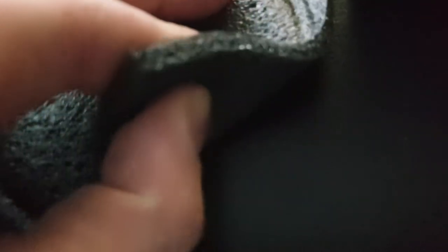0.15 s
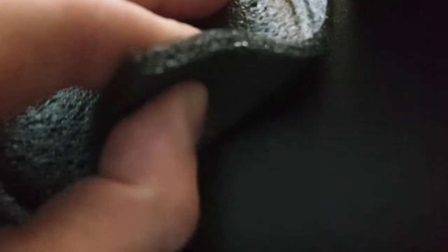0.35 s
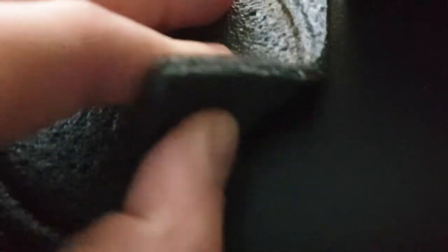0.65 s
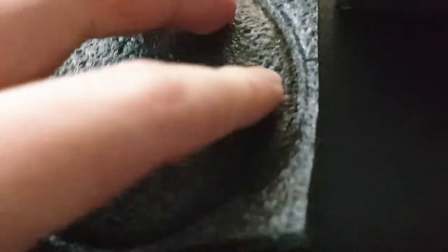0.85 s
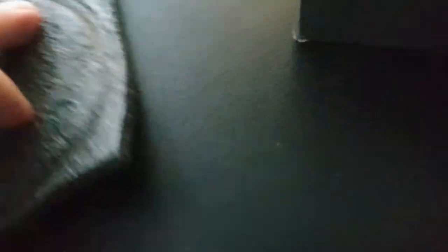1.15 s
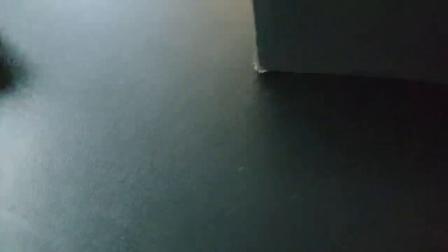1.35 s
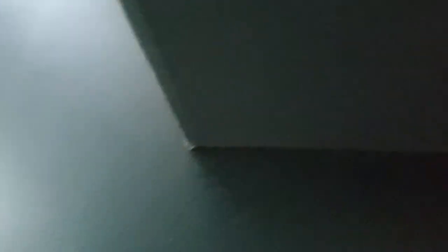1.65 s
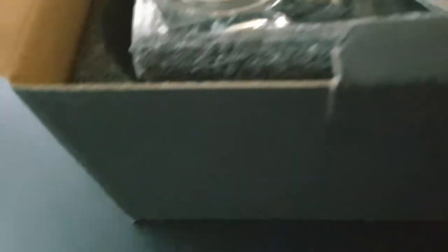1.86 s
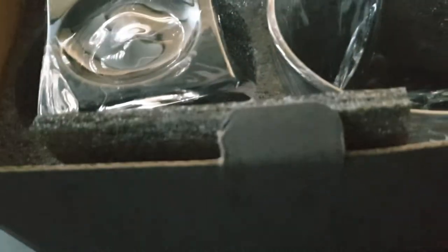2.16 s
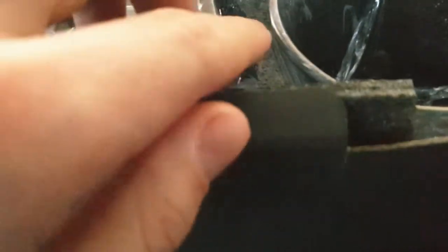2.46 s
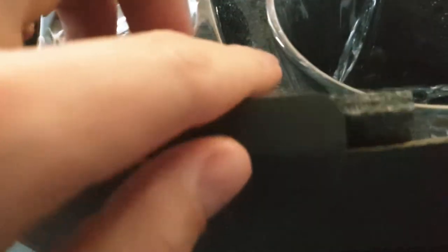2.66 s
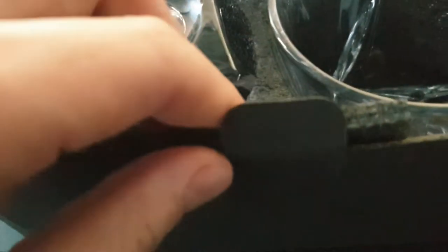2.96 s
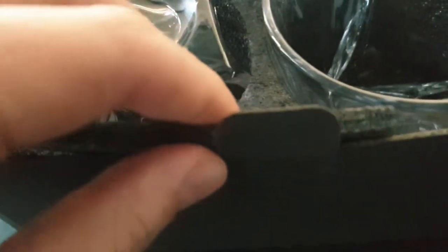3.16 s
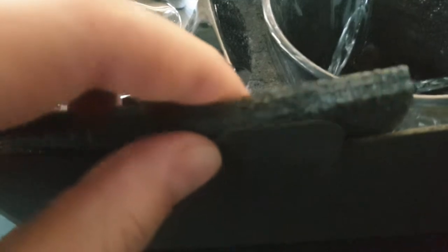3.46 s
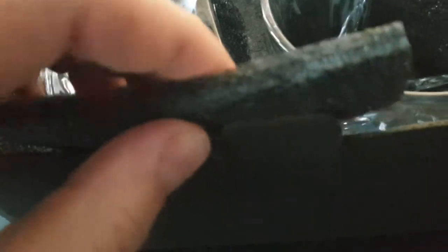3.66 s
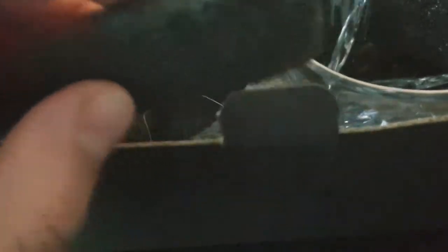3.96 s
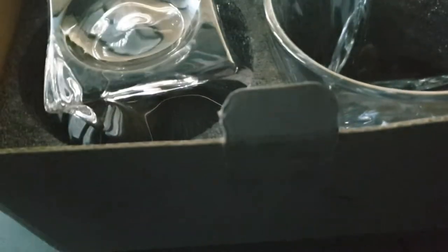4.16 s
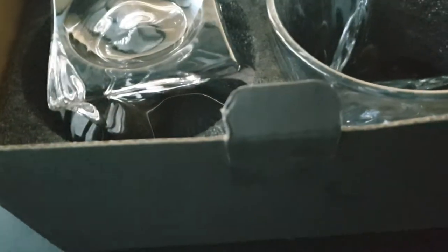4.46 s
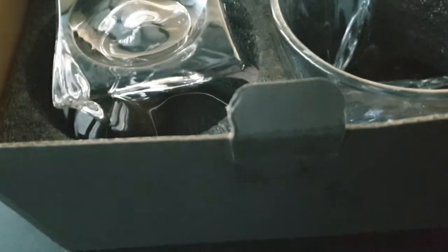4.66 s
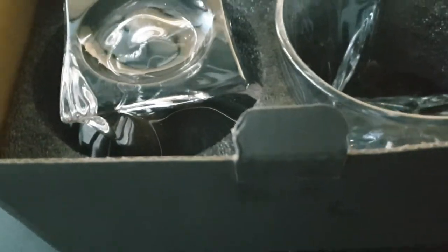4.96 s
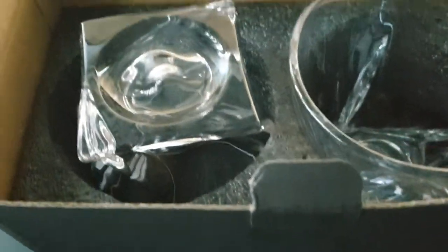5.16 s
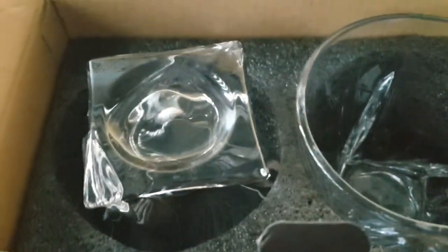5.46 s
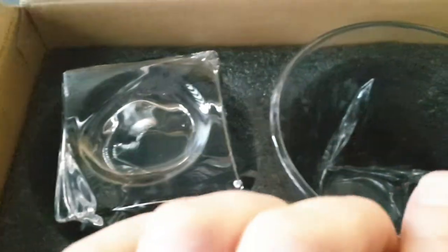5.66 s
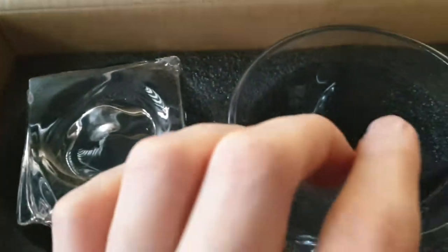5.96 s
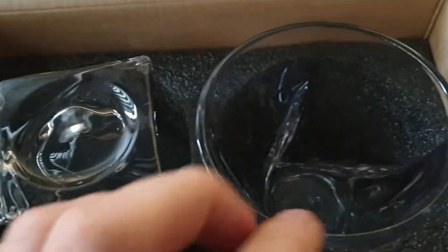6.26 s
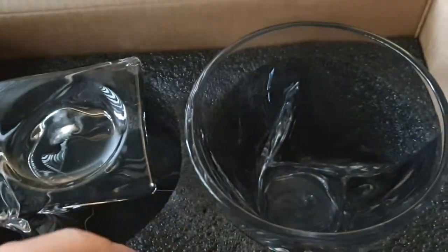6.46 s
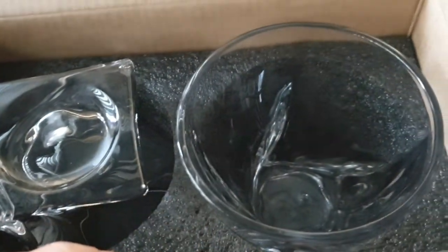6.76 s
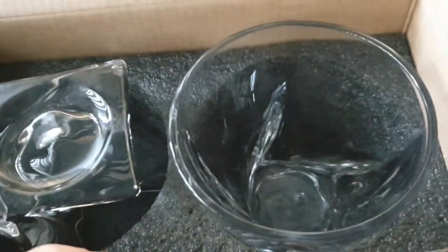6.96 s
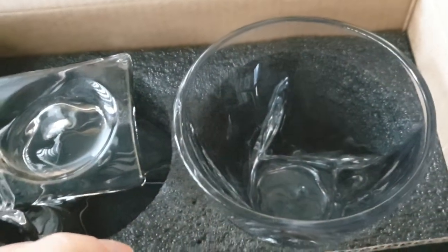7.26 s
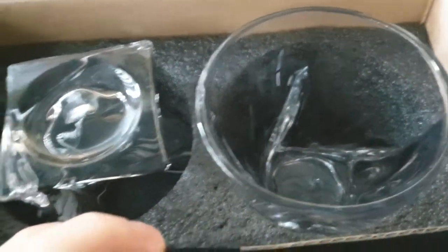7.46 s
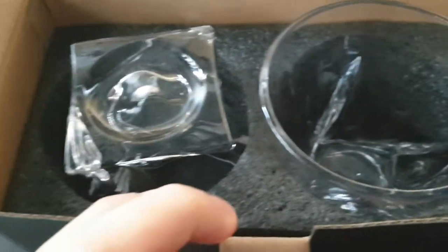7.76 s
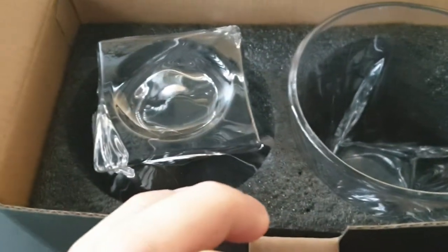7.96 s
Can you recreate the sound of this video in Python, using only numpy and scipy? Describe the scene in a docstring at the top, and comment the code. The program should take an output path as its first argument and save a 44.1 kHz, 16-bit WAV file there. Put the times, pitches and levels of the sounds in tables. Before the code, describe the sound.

Foam packing is pulled from a cardboard box holding glassware on a desk. Light rubbing and ticks lead into one long bright scraping hiss, then a pause, loud card snaps, short gritty scrapes and soft crackles. Later come dull box bumps, a barely audible glassy brush and a sharp final snap. Close stereo microphone, dry, with short reflections and quiet room hiss.

```python
"""Foam packing is pulled from a cardboard box of glassware on a desk, close microphone, small quiet room.
Room tone lies under all of it. Fingers rub and tick a foam block loose; it slides out in one hissing pull.
Then the hand knocks the flap, and a strip of foam catches and comes up in jerks: cells hiss, edges rasp.
Last the flap folds over, a brushed glass sings faintly and the flap clicks hard twice.
Filtered noise makes the rubbing, damped modes the snaps and box bumps; sparse reflections answer."""
import sys
import numpy as np
from scipy import signal
from scipy.fft import rfft, irfft, next_fast_len
from scipy.io import wavfile
from scipy.ndimage import map_coordinates

SR = 44100
rng = np.random.default_rng(int(sys.argv[2]) if len(sys.argv) > 2 else 0)


def generate_wav(signal):
    """Clip the signal to [-1, 1] and save it as 16-bit WAV at the path in sys.argv[1]."""
    frames = np.transpose(np.atleast_2d(signal))
    scaled = np.clip(frames, -1, 1) * 32767
    pcm = np.round(scaled).astype(np.int16)
    wavfile.write(sys.argv[1], SR, pcm)


N = 358091


def amp(db):
    """Decibels to gain."""
    return 10 ** (np.asarray(db) / 20)


def unit(x):
    """Scales to an rms of one."""
    return x / np.sqrt(np.mean(x ** 2) + 1e-20)


def read(points, hz):
    """Reads a table along a logarithmic frequency axis."""
    f, value = np.transpose(points)
    return np.interp(np.log(hz + 1), np.log(f + 1), value)


def add(mix, start_s, sound):
    """Mixes a stereo sound in at its start time."""
    part = mix[:, max(round(start_s * SR), 0):][:, :sound.shape[1]]
    part += sound[:, :part.shape[1]]


def placed(x, side_db):
    """Leans a sound to the left by side_db."""
    return x * amp(np.array([side_db, -side_db]).reshape(2, -1) / 2)


def wobble(size, span_s):
    """Smooth random curve of unit rms that changes over span_s."""
    width = max(int(span_s * SR), 2)
    return unit(signal.oaconvolve(rng.standard_normal(size + width + 1), np.hanning(width + 2), "valid"))


def colour(x, spectrum, size=4096):
    """Causal minimum-phase filter with the given spectrum."""
    log_gain = np.log(amp(read(spectrum, abs(np.fft.fftfreq(size, 1 / SR)))))
    taps = np.fft.ifft(np.exp(np.conj(signal.hilbert(log_gain)))).real
    return signal.oaconvolve(x, taps[None], axes=1)[:, :x.shape[1]]


# Left-right likeness of noise at the microphone: pitch_hz, likeness (1 = identical)
LIKENESS = [(100, .88), (400, .95), (1000, .84), (2500, .7), (5000, .55), (9000, .2), (16000, .15)]


def noise(size):
    """Noise at two microphone ports: alike in the bass, nearly unrelated in the treble."""
    padded = next_fast_len(size)
    a, b = rfft(rng.standard_normal((2, padded)))
    same = np.clip(read(LIKENESS, np.linspace(0, SR / 2, len(a))), -1, 1)
    return irfft([a, same * a + np.sqrt(1 - same ** 2) * b], padded)[:, :size]


def narrow_noise(size, hz, width_hz):
    """Noise in one resonance."""
    edges = [hz - width_hz / 2, hz + width_hz / 2]
    band = signal.butter(2, edges, "bandpass", fs=SR, output="sos")
    return unit(signal.sosfilt(band, noise(size)))


FALL_DB, FALL_SHAPE = 15.5, 1.3  # a movement loses FALL_DB in its fall time, slowly at first


def swell(t, rise_s, fall_s):
    """A movement gathers speed smoothly and dies away."""
    gather = np.sin(np.pi / 2 * np.clip(t / rise_s, 0, 1)) ** 2
    return gather * amp(-FALL_DB * (np.maximum(t - rise_s, 0) / fall_s) ** FALL_SHAPE)


# Spectrum of the quiet room: pitch_hz, level_db per Hz (relative)
ROOM_SPECTRUM = [(20, -12.5), (40, -6.5), (55, 10), (80, 0.5), (125, -3.5), (200, -9.5), (300, -13),
                 (600, -25), (1000, -29.5), (1900, -25), (3500, -30.5), (4500, -32.5), (6000, -34),
                 (15500, -35.5)]
# The box rumbles as it shifts on the desk: start_s, rise_s, fall_s, level_db
BOX_SHIFTS = [(.95, 0.17, 1, -56), (2.43, .15, 0.52, -52.5), (3.1, 0.2, .6, -62), (4.45, 0.18, 0.74, -61),
              (5.35, .3, .55, -53.5)]


def room_tone(rumble_db=-69, hiss_db=-65.0, waver_db=2.5, side_db=4.0):
    """Wavering rumble of the building under a faint hiss; the rumble swells when the box shifts."""
    t = np.arange(N) / SR
    level = amp(rumble_db + waver_db * wobble(N, .3))
    for start_s, rise_s, fall_s, db in BOX_SHIFTS:
        level = np.hypot(level, amp(db) * swell(t - start_s, rise_s, fall_s))
    bed = unit(colour(noise(N), ROOM_SPECTRUM))
    bass = signal.sosfilt(signal.butter(1, 250, fs=SR, output="sos"), bed)
    return placed(level * bass + amp(hiss_db) * (bed - bass), side_db)


# Faint steady tones in the room: pitch_hz, width_hz, level_db
ROOM_WHINE = [(1110, 25, -93.5), (4420, 91, -91.5)]


def room_whine():
    """Steady whine: noise in narrow resonances."""
    return sum(amp(db) * narrow_noise(N, hz, width_hz) for hz, width_hz, db in ROOM_WHINE)


def friction(size, spectrum, grain_db, slip_db):
    """Countless cells catch and let go: millisecond grains, bunched into uneven slips."""
    grip = amp(grain_db * wobble(size, 0.0014) + slip_db * wobble(size, 0.019))
    return unit(colour(noise(size) * grip, spectrum))


def wall_echo(x, share=0.403, path_s=.0007, drift=0.23, span_s=.25):
    """The near box wall reflects the rubbing; the path drifts at random, so the colour shifts."""
    at = np.arange(x.shape[1])
    late = path_s * SR * np.exp(drift * wobble(len(at), span_s))
    echo = np.array([map_coordinates(port, [at - late], order=3) for port in x])
    return unit(x + share * echo)


# Spectra of the foam's face and of its cut edge: pitch_hz, level_db per Hz (relative)
FOAM_CELLS = [(1000, -43), (2500, -27.5), (4000, -12.5), (5200, -3), (6600, 1.5), (8500, -2), (11500, -6),
              (15500, -5.5)]
FOAM_EDGE = [(700, -26), (1400, -13), (2000, -3.5), (2700, -5), (3800, -1.5), (5000, -4), (7000, -15.5),
             (12000, -27.5)]


def crackle(size, per_s=45, spread_db=4):
    """Now and then a single foam cell pops."""
    strength = amp(spread_db * np.minimum(rng.exponential(1, size), 3.5))
    pops = strength * (rng.random(size) < per_s / SR)
    pops = pops * (1 + rng.standard_normal((2, size)))  # the ports hear each pop differently
    return unit(unit(colour(pops, FOAM_EDGE)) + unit(colour(pops, FOAM_CELLS)))


# Spectrum of the card panels: pitch_hz, level_db per Hz (relative)
CARD_PANEL = [(30, -37), (80, -19.5), (150, -11.5), (240, -2), (320, -9), (420, -1.5), (520, -3),
              (750, -5.5), (950, -2.5), (1200, -5.5), (1600, -11), (2500, -14.5), (6000, -48)]
# Rubbing makes the card drone: pitch_hz, width_hz, level_db before drone_db, relative to the panel
DRONES = [(254, 32, -10), (860, 340, -2.5)]


def rub(size, hiss_db, rasp_db, panel_db, side_db, drone_db=0, crackle_db=-11.5, panel_side_db=5):
    """Foam on card: the face hisses, the edge rasps and crackles, and the card under it rumbles."""
    foam = amp(hiss_db) * friction(size, FOAM_CELLS, grain_db=1.0, slip_db=0.89)
    edge = wall_echo(friction(size, FOAM_EDGE, grain_db=2.0, slip_db=0.5))
    foam += amp(rasp_db) * (edge + amp(crackle_db) * crackle(size))
    card = wall_echo(friction(size, CARD_PANEL, grain_db=2.5, slip_db=1.25), path_s=0.0024)
    for hz, width_hz, db in DRONES:
        card += amp(db + drone_db) * narrow_noise(size, hz, width_hz)
    return placed(foam, side_db) + placed(amp(panel_db) * unit(card), panel_side_db)


# Short rubs and tugs of foam on card: the fingers work the block loose, reach behind the flap for
# the strip, bring it up in jerks, then press the flap down and fold it out of the way:
# start_s, rise_s, fall_s, hiss_db, rasp_db, panel_db, side_db (left over right)
RUBS = [ (0, 0.0071, 0.42, -59.5, -74.5, -82.5, 4.5), (.5, 0.16, 0.16, -52.5, -66.5, -88, 5),
        (.66, .125, 0.11, -44.5, -52, -80, 3), (2.41, 0.032, 0.097, -57, -54, -47, 6),
        (2.541, 0.031, .06, -66, -61, -53, 3.5), (2.596, 0.052, 0.13, -63, -53.5, -47.5, 5),
        (2.74, 0.053, 0.048, -51.5, -54.5, -45, 5), (2.801, 0.063, 0.25, -60.5, -82, -74, 5),
        (2.968, .018, 0.073, -47, -57, -50, 4.5), (3.048, 0.075, 0.27, -55.5, -67, -65.5, 6.5),
        (3.219, 0.17, 0.12, -51.5, -63.5, -54, 7.5), (3.389, 0.085, .12, -46.5, -52.5, -50.5, 5.5),
        (3.59, 0.074, 0.1, -44.5, -50, -53, 9.5), (3.68, 0.087, 0.12, -41, -42, -48, 5),
        (3.84, .1, 0.21, -62.5, -58, -49.5, 21), (3.945, 0.032, 0.025, -46.5, -45, -53, 4.5),
        (3.989, 0.046, 0.025, -50, -52, -48, 4), (4.02, .06, 0.37, -58.5, -88, -83, 10.5),
        (4.163, 0.016, 0.03, -43, -50, -49.5, 11), (4.195, 0.038, 0.055, -51, -55.5, -65, 9),
        (4.241, .022, 0.089, -40, -44, -63, 8.5), (4.378, 0.048, .09, -46, -51, -87, 5.5),
        (4.425, .04, 0.04, -42, -56, -73, 7), (4.48, 0.043, 0.27, -53, -63.5, -81, 4),
        (4.64, 0.12, 0.15, -49, -59.5, -77, 5.5), (4.766, 0.028, 0.034, -41.5, -46.5, -63.5, 5.5),
        (5.54, 0.03, 0.15, -58.5, -47.5, -47.5, 1.5), (5.69, 0.099, 0.18, -87, -66, -60, 2),
        (5.812, .026, .2, -80, -57.5, -46.5, -3), (5.83, 0.097, .08, -57, -53.5, -62, 5),
        (5.97, .05, .3, -80.5, -83, -84, 7), (6.17, 0.096, 0.31, -60.5, -58, -53, 1.5),
        (6.41, .04, .1, -71.5, -66.5, -60, 3)]


def stroke(start_s, rise_s, fall_s, hiss_db, rasp_db, panel_db, side_db):
    """One short rub: all its layers follow the same swell."""
    t = np.arange(0, rise_s + 2 * fall_s, 1 / SR)
    return start_s, swell(t, rise_s, fall_s) * rub(len(t), hiss_db, rasp_db, panel_db, side_db)


def resonance(length_s, hz, db, q, side_db=4):
    """Rubbing drives a single resonance; q is its pitch over its width."""
    size = int(length_s * SR)
    sound = amp(db) * narrow_noise(size, hz, hz / q)
    return placed(sound * signal.windows.tukey(size, .5), side_db)


# The rubbed card sings briefly: start_s, length_s, pitch_hz, level_db
CARD_GROANS = [(0, .6, 432, -72), (.112, .14, 460, -65), (1.832, 0.069, 980, -64.5),
               (1.851, 0.028, 630, -63), (2.022, 0.058, 594, -63), (2.025, .05, 1190, -70),
               (2.553, .028, 1384, -50.5), (2.6, 0.066, 1360, -50.5), (2.765, .045, 972, -47.5),
               (4.666, 0.13, 2760, -66.5), (4.812, 0.055, 650, -63), (5.832, 0.17, 2180, -60)]


def groan(start_s, length_s, hz, db):
    """The rubbed card groans in a broad resonance."""
    return start_s, resonance(length_s, hz, db, q=6)


def ring(modes, pitch=1, size=12000):
    """Response of a set of damped modes to one blow."""
    t = np.arange(size) / SR
    sound = np.zeros(size)
    for hz, t60_s, db in modes:
        decay = np.exp(-np.log(1000) * t / t60_s)
        sound += amp(db) * decay * np.sin(2 * np.pi * hz * pitch * t)
    return sound


def burst(size, contact_s):
    """A contact tears free: a short flurry of micro-slips with an even spectrum."""
    t = np.arange(size) / SR
    shape = 2 * (t / contact_s) * np.exp(1 - 2 * t / contact_s)
    even = irfft(np.exp(1j * np.angle(rfft(noise(size) * shape))), size)  # keeps only the phases
    return unit(even * np.sqrt(shape))


# Modes of the box wall, which knocks, and of its small stiff tab, which cracks:
# pitch_hz (before the snap's pitch factor), t60_s, level_db (relative)
WALL_MODES = [(251, 0.25, -20.5), (520, 0.016, -9.5), (726, 0.017, -2), (1058, 0.019, -4),
              (1415, 0.023, -5), (1820, 0.016, -1), (2700, 0.021, 1.5), (3450, 0.033, 0.5)]
TAB_MODES = [(745, 0.003, -3), (1420, .016, -7.5), (2100, 0.013, -6.5), (2840, .014, 1), (4700, .009, 5),
             (5180, .01, 0), (5620, .008, 2.5), (6340, .007, -2)]
# How well a knock, a crack and a tick radiate: pitch_hz, level_db (relative)
KNOCK_RADIATION = [(25, -34.5), (90, -11), (250, -6.5), (700, 6), (1800, 2.5), (3400, -3), (6000, -20.5)]
CRACK_RADIATION = [(100, -32.5), (450, -11.5), (700, -5), (2300, -1), (6500, -1), (8000, -7.5),
                   (12000, -22)]
TICK_RADIATION = [(4000, -32), (7500, 0), (11000, -8.5), (15000, -6.5)]
# Card and foam snap: light ticks as the block comes free, the hand knocks against the flap, the strip
# catches and lets go, the flap folds over, then clicks hard twice; levels are over 10 ms:
# start_s, knock_db, crack_db, tick_db, pitch_factor, side_db (left over right)
CARD_SNAPS = [ (.163, -90, -70, -50, 0.93, 6), (0.669, -49, -40, -43, 1.21, 3.5),
              (.819, -70, -51.5, -41, 0.95, 8), (0.9375, -86, -44.5, -33, 1.03, 3),
              (0.986, -77, -43.5, -43, 0.8, 1), (1.8993, -66.5, -74, -71, .86, -13),
              (1.936, -64, -73.5, -66, .86, -12), (2.029, -64.5, -88, -79, 0.97, -2),
              (2.431, -55.5, -54, -59.5, 1.1, 9), (2.4428, -32, -38.5, -42, .97, 3.5),
              (2.4542, -37, -41, -42, 1.56, 5), (2.467, -51, -44, -51, 1, 9),
              (2.479, -27.5, -35, -36, 1, 2.5), (2.559, -63, -64, -77, 1.1, 3),
              (2.607, -52, -61, -70.5, 1, 6), (2.703, -25, -21, -28.5, 1.057, 4),
              (2.98, -51, -50.5, -53, 1.23, 12), (2.992, -44.5, -53, -48, 0.976, 6),
              (3.4623, -46, -37.5, -40, 1.18, 7), (3.48, -39.5, -40, -38.5, 0.87, 12.5),
              (3.4865, -32, -33, -39, 0.93, 3), (3.785, -39, -50, -50, 0.76, 6.5),
              (3.872, -58, -42, -45, 1.02, 4.5), (4.1636, -66, -60, -44.5, 0.78, 12.5),
              (4.2624, -59.5, -47.5, -44.5, 1.06, 14), (5.017, -67.5, -68, -73.5, 0.51, -1.5),
              (5.532, -43.5, -55, -64, 0.936, 3), (5.542, -33, -42.5, -42, 0.93, 6),
              (5.566, -33, -34, -37.5, .95, 5), (5.574, -30.5, -36.5, -39, 1.09, 4),
              (5.593, -36, -55, -42.5, 1.1, 3), (5.688, -48, -56.5, -67, 0.88, 9),
              (5.9448, -42.5, -45.5, -56, 1.03, 3), (6.2001, -56, -61.5, -75, 1.38, 14),
              (6.3014, -28.5, -17.5, -25.5, 1.07, 6), (6.396, -40, -42, -52, 1.3, 12),
              (6.4022, -43, -36.5, -34, .35, 2), (6.405, -15.5, -23.5, -29, 1, 5.5)]
# the more the knock outweighs the tick, the longer the contact
CONTACT_S, CONTACT_DOUBLES_DB = .0015, 28.5


def snap(start_s, knock_db, crack_db, tick_db, pitch, side_db, inside_db=-10.0,
         inside_fall_s=0.019, inside_rise_s=.0017, tick_spread=1.9, size=6000):
    """A sudden release rings wall and tab; the sound scatters round the inside of the box."""
    t = np.arange(size) / SR
    contact_s = CONTACT_S * 2 ** ((knock_db - tick_db) / CONTACT_DOUBLES_DB)
    force = burst(size, contact_s)
    wall = signal.fftconvolve(force, ring(WALL_MODES, pitch, size)[None], axes=1)[:, :size]
    tab = signal.fftconvolve(force, ring(TAB_MODES, pitch, size)[None], axes=1)[:, :size]
    tick = burst(size, contact_s * tick_spread)
    inside = noise(size) * np.exp(-t / inside_fall_s) * (1 - np.exp(-t / inside_rise_s))
    layers = ((wall, KNOCK_RADIATION, knock_db), (tab, CRACK_RADIATION, crack_db),
              (tick, TICK_RADIATION, tick_db))
    sound = np.zeros((2, size))
    for x, radiation, db in layers:
        paths = colour(np.vstack([x, inside]), radiation, size=2048)
        direct, scattered = np.split(paths / np.linalg.norm(paths, axis=1, keepdims=True), 2)
        sound += amp(db) * (direct + amp(inside_db) * scattered)
    return start_s, placed(sound * np.sqrt(.01 * SR), side_db)  # unit energy to rms over 10 ms


# The foam block slides out of the box in one long pull: time_s, hiss_db (stands for its speed)
BLOCK_SPEED = [(.87, -53.5), (.93, -45), (1.0, -33.5), (1.15, -31.5), (1.26, -27), (1.41, -28), (1.5, -34),
               (1.68, -37), (1.789, -46), (1.88, -69.5), (2.0, -88)]
# Other layers follow the speed by their own law: level_db at full speed, slope_db per dB of hiss
RASP_LAW = (-44.5, .7)
PANEL_LAW = (-53.5, 0.76)
SHEEN_LAW = (-39, 2.4)
SHEEN_HZ, SHEEN_WIDTH_HZ = 6000, 1200  # bright band, strongest when the block slides fastest


def long_pull(side_db=5.0, drone_db=-7):
    """The speed of the sliding block drives hiss, rasp, card and sheen together."""
    time_s, level_db = np.transpose(BLOCK_SPEED)
    t = np.arange(time_s[0], time_s[-1], 1 / SR)
    hiss_db = np.interp(t, time_s, level_db)
    below_full_db = hiss_db - level_db.max()
    rasp_db, panel_db, sheen_db = (db + slope * below_full_db for db, slope in (RASP_LAW, PANEL_LAW, SHEEN_LAW))
    sheen = placed(amp(sheen_db) * narrow_noise(len(t), SHEEN_HZ, SHEEN_WIDTH_HZ), side_db)
    sliding = rub(len(t), hiss_db, rasp_db, panel_db, side_db, drone_db) + sheen
    return time_s[0], sliding * signal.windows.tukey(len(t), .03)


# Modes of the whole box and of its side panel: pitch_hz, t60_s, level_db (relative)
BOX_MODES = [(75.6, .16, -6), (106, 0.049, -7), (123, .15, -2.5)]
SIDE_PANEL_MODES = [(165, .08, -6), (215, .05, -6), (261, .11, -1), (335, .06, -2)]
# The box bumps on the desk: start_s, box_db, panel_db (gains on the modes)
BOX_BUMPS = [(1.13, -46.5, -54), (2.442, -38.5, -46), (2.481, -43, -40.5), (2.705, -41.5, -68),
             (4.181, -79, -52), (5.015, -48, -66), (5.536, -39.5, -34.5), (5.571, -38, -59),
             (5.69, -40.5, -45.5), (5.952, -36.5, -60), (6.008, -44.5, -45), (6.406, -38, -25.5)]


def bump(start_s, box_db, panel_db, side_db=5):
    """The box rocks on the desk and its side panel drums; the thud is high-passed so that it carries no deep
    bass."""
    thud = amp(box_db) * ring(BOX_MODES) + amp(panel_db) * ring(SIDE_PANEL_MODES)
    no_deep_bass = signal.butter(2, 65, "highpass", fs=SR, output="sos")
    return start_s, placed(signal.sosfilt(no_deep_bass, thud), side_db)


# A finger brushes the glass: start_s, length_s, pitch_hz, level_db
GLASS_BRUSHES = [(6.03, .07, 2660, -71), (6.01, .1, 4880, -78)]


def glass(start_s, length_s, hz, db):
    """The brushed glass sings faintly in a sharp resonance."""
    return start_s, resonance(length_s, hz, db, q=35)


# Phase by which the right port trails the left: pitch_hz, lag_rad
RIGHT_PORT_LAG = [(0, 0), (150, .15), (300, .25), (550, .5), (1000, 1.1), (2000, 1.4), (16000, 1.5)]


def from_left(x):
    """The hand works on the left, so its sounds reach the right port later."""
    size = next_fast_len(N)
    lag = np.exp(-1j * read(RIGHT_PORT_LAG, np.fft.rfftfreq(size, 1 / SR)))
    return np.array([x[0], irfft(rfft(x[1], size) * lag, size)[:N]])


# Decay of the room: pitch_hz, t60_s
ROOM_DECAY = [(100, .3), (300, 0.35), (700, .18), (2000, 0.21), (6000, .19), (15000, 0.12)]


def room(x, wet_db=-19, delay_s=0.01, per_s=3000, size=16384):
    """Dense reflections from the desk and near walls, each band dying at its own speed."""
    taps = noise(size) * (rng.random(size) < per_s / SR) * (np.arange(size) > delay_s * SR)
    hz, t, bands = signal.stft(taps, SR, nperseg=256)
    decay = np.exp(-np.log(1000) * t / read(ROOM_DECAY, hz)[:, None])
    tail = signal.istft(bands * decay, SR, nperseg=256)[1]
    tail /= np.linalg.norm(tail, axis=1, keepdims=True)
    return amp(wet_db) * signal.oaconvolve(x, tail, axes=1)[:, :N]


def scene():
    """All handling sounds, their reflections, the room tone and its whine."""
    handling = np.zeros((2, N))
    sources = ((stroke, RUBS), (groan, CARD_GROANS), (snap, CARD_SNAPS), (bump, BOX_BUMPS), (glass, GLASS_BRUSHES))
    for source, table in sources:
        for row in table:
            add(handling, *source(*row))
    add(handling, *long_pull())
    return from_left(handling) + room(handling) + room_tone() + room_whine()


# Treble response of the microphone: pitch_hz, level_db
MICROPHONE_TREBLE = [(6900, -0.5), (7500, -5.5), (8100, -10.5), (9200, -8), (10500, -1.5), (11500, 2.5)]
CUTOFF_HZ, CEILING = 16000, .95  # band limit; level that soft overload approaches


def record(dry):
    """The microphone's bass roll-off and hollow treble, soft overload on loud peaks, then the band limit."""
    roll_off = signal.butter(2, 34, "highpass", fs=SR, output="sos")
    heard = signal.sosfilt(roll_off, colour(dry, MICROPHONE_TREBLE))
    heard = heard / (1 + (heard / CEILING) ** 4) ** .25
    low_pass = signal.firwin(511, CUTOFF_HZ, window=("kaiser", 7), fs=SR)
    return signal.oaconvolve(heard, low_pass[None], "same", axes=1)


dry = scene()
out = record(dry)
generate_wav(out)
```